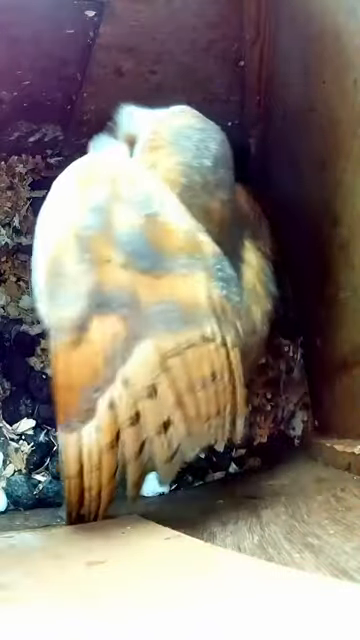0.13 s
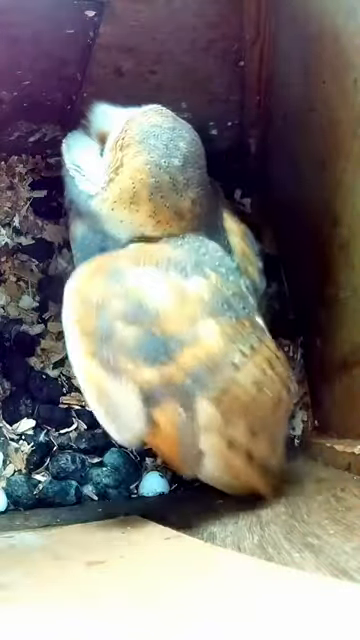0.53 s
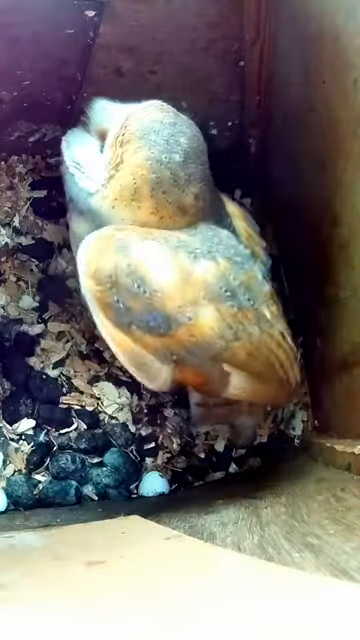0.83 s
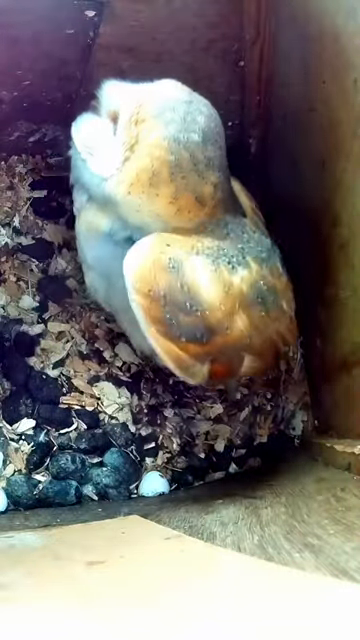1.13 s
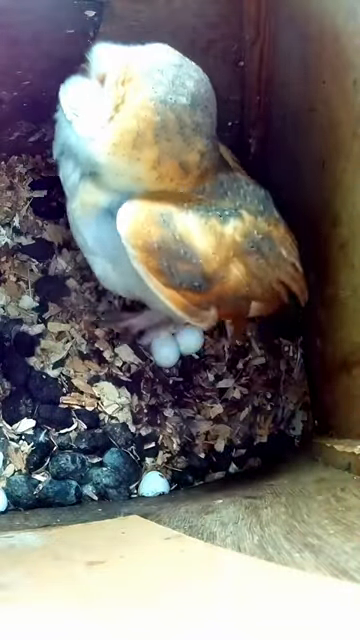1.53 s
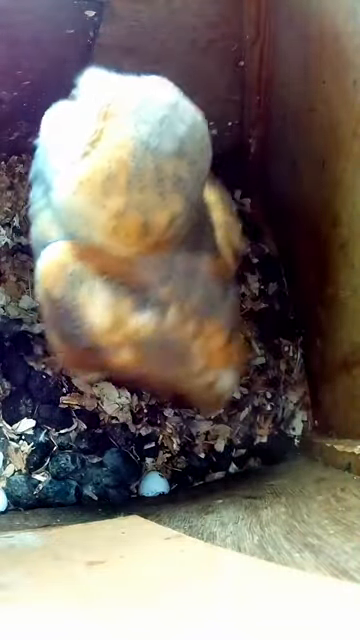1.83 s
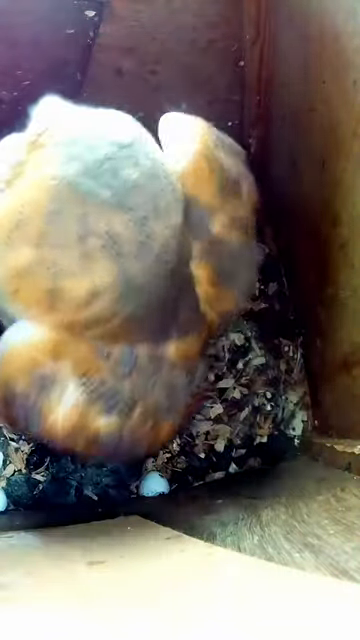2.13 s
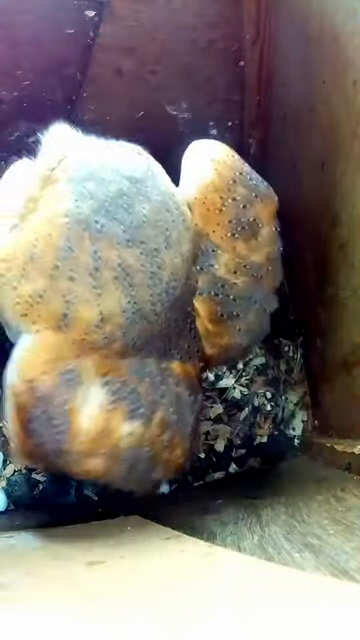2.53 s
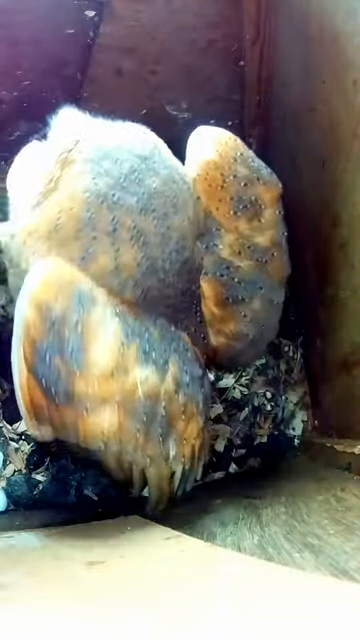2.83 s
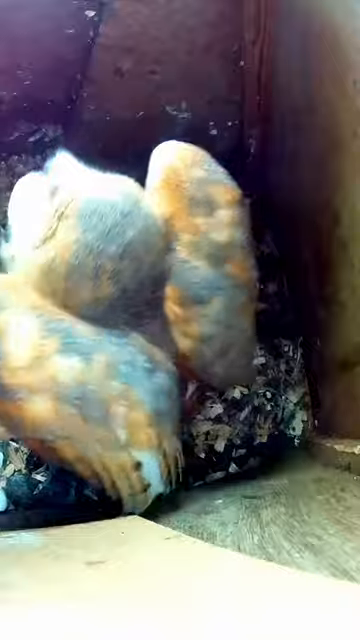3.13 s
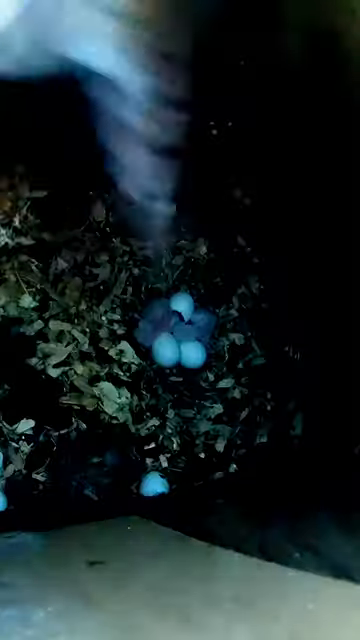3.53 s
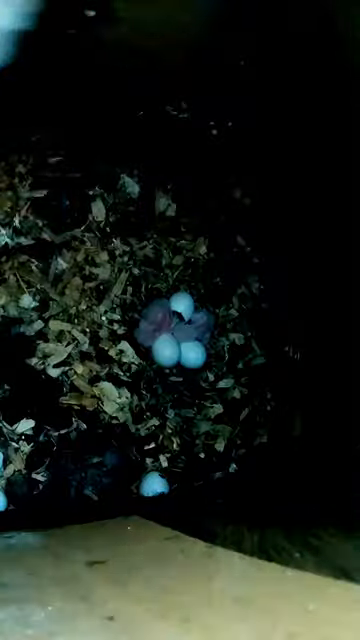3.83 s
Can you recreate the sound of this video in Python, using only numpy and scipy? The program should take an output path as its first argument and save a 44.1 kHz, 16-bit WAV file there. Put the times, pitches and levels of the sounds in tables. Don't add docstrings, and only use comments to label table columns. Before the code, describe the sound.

An owl moves in a wooden nest box, heard close up. Until 2.6 seconds there is quiet rumble, faint hiss, dry litter specks, tiny ticks, a distant songbird and a soft boom near 1.1. At 2.7 low thumps begin; from 2.8 to 3.0 come two short creaks, feather swish, sharp claw snaps and loud board knocks. Smaller knocks follow at 3.3, 3.45 and 3.8, with a faint scrape at 3.6 and tiny peeps at the end.

```python
import sys
import numpy as np
from scipy import signal
from scipy.fft import rfft, irfft
from scipy.io import wavfile
from scipy.ndimage import uniform_filter1d

SR = 44100
rng = np.random.default_rng(int(sys.argv[2]) if len(sys.argv) > 2 else 0)


def dump(signal):
    limited = np.clip(np.atleast_2d(signal).T, -1, 1)
    pcm = np.round(limited * 32767).astype(np.int16)
    wavfile.write(sys.argv[1], SR, pcm)


def convert_level_to_amplitude(level_db):
    exponent = np.asarray(level_db, float) / 20
    return 10 ** exponent


N = 176400

# time in seconds, level in dB.
STIR_LEVEL = [(2.551, -61), (2.7, -49), (2.85, -32.5), (3.0, -43.5), (3.2, -44.5), (3.25, -50.5),
              (3.32, -53), (3.44, -50), (3.5, -46.5), (3.66, -49.5), (3.79, -42.5), (3.88, -46.5),
              (4.0, -54)]
# frequency in Hz, density in dB per Hz.
STIR_SPECTRUM = [(60, 5), (130, -21), (200, -19), (285, -10), (520, -22), (1050, -27), (1600, -35),
                 (16000, -47.5)]
# start in seconds, length in seconds, level in dB, centre in Hz.
SWISHES = [(0.77, 0.067, -64.5, 8800), (1.077, 0.044, -62, 10900), (1.081, 0.1, -51.5, 160),
           (1.141, 0.021, -66.5, 4630), (1.432, 0.072, -69.5, 8000), (2.47, 0.062, -67.5, 9000),
           (2.637, 0.042, -58.5, 9600), (2.678, 0.0088, -51, 8900), (2.702, 0.072, -48, 5900),
           (2.643, 0.26, -42.5, 147), (2.783, 0.078, -39, 9650), (2.854, 0.16, -58, 3840),
           (2.889, 0.072, -31.5, 750), (2.989, 0.048, -52.5, 5700), (3.036, 0.067, -59, 5500),
           (3.09, 0.15, -48.5, 6000), (3.297, 0.086, -54, 670), (3.453, 0.025, -58, 7000),
           (3.478, 0.26, -54, 820), (3.696, 0.081, -49.5, 415), (3.488, 0.13, -68, 3800),
           (.69, 0.22, -59, 167), (1.483, 0.079, -60, 172), (3.64, 0.23, -67, 6000),
           (3.761, 0.092, -39, 234), (3.902, 0.11, -63.5, 6500)]
# time in seconds, peak in dB, centre in Hz, spread in octaves, snap in ms.
TICKS = [(.845, -46, 8000, 1.5, 1.34), (0.9093, -47, 11000, .8, 1.6), (1.081, -51, 9000, 1.2, 1.8),
         (1.109, -54, 4000, 1, 1.9), (2.6455, -47, 8000, 0.38, 0.9), (2.707, -46, 4000, 1.2, 1.5),
         (2.7216, -31, 1660, 0.45, 2.6), (2.7544, -28.5, 4500, 1.3, 0.65), (2.7605, -33, 4000, .9, 0.66),
         (2.8297, -24, 6500, 0.88, 0.77), (2.835, -24.5, 3750, 0.73, 4), (2.8954, -33, 4770, 0.57, 1.1),
         (2.908, -26, 4300, 0.42, 1), (2.91, -27.5, 5100, 0.88, 2.2), (2.917, -26, 4270, 0.34, 1.2),
         (2.9235, -25, 4530, 0.44, 1.4), (2.9274, -13, 6040, 0.58, 2.03), (2.9283, -16, 2150, 0.6, 2.47),
         (2.943, -29, 4240, 0.77, 1.1), (2.96, -30.5, 4200, 0.56, 2), (2.9691, -24, 4630, 0.65, 1.46),
         (3.0515, -38.5, 4000, 0.82, 1.8), (3.2832, -41.5, 5500, 0.99, 2.5),
         (3.2864, -37.5, 2400, 0.6, 3.2), (3.2993, -42, 3800, 0.37, 1.2), (3.315, -45.5, 3800, 0.88, 1.6),
         (3.387, -51.5, 3200, 0.97, 2.2), (3.448, -47, 4940, 0.77, 1.5), (3.458, -37, 5500, 1, 2.7),
         (3.4699, -34.5, 5460, 0.61, 2.3), (3.5363, -49, 2200, 0.81, 1.8), (3.571, -34.5, 4100, 0.59, 2.6),
         (3.572, -33, 1600, 0.36, 2), (3.5864, -36.5, 3500, 0.13, 2), (3.618, -33.5, 6130, 0.88, 2.5)]
# time in seconds, peak in dB, pitch factor, low-mode share in dB, ring factor.
KNOCKS = [(.067, -48, 0.57, 13, .9), (.325, -57.5, 0.97, -10, 0.6), (.695, -52.5, 0.88, -1.5, .9),
          (.775, -53.5, 0.82, -14, 0.64), (0.842, -50.5, 0.58, 7, .9), (1.083, -55, 0.96, -14, 0.49),
          (2.72, -32.5, 0.75, -7, .6), (2.8271, -15.5, .95, -14.5, 0.6), (2.834, -19, 1.395, -5.5, 0.34),
          (2.838, -22.5, 0.92, -7, 0.7), (2.929, -13, 0.978, -14, 0.54), (2.9712, -21.5, 1.01, -0.5, 0.55),
          (2.978, -17, .97, 8.5, 0.87), (3.015, -30.5, .95, 5, 0.56), (3.108, -36.5, 0.83, 14, 0.72),
          (3.2856, -19, 1.04, -5, 0.46), (3.3, -30.5, 0.81, 2, .6), (3.316, -28, 1.03, 0.5, 0.59),
          (3.388, -31, 0.98, 3, 0.61), (3.449, -35, 0.76, -18, 0.83), (3.4608, -19, 0.971, -11, 0.51),
          (3.503, -42, 1.1, 0, 0.44), (3.517, -36.5, 0.99, 3, 0.65), (3.572, -37, 0.96, -5, 0.88),
          (3.586, -39, 0.97, -18, 0.46), (3.703, -40, 0.83, 22, 1.2), (3.749, -36, 1.4, -14, 1.5),
          (3.754, -34, 0.97, -6.5, 1.2), (3.776, -29.5, 0.93, 13, 0.7), (3.912, -48, 1.03, 1, .9)]
# frequency in Hz, level in dB, T60 in seconds.
BOARD_LOW = [(274, -12, 0.1), (398, -10, 0.033), (499, 0, 0.051), (562.7, -1, 0.048), (670, -12.5, 0.059)]
# frequency in Hz, level in dB, T60 in seconds.
BOARD_HIGH = [(759, -20.5, .06), (887, -9, 0.038), (972, 0, 0.051), (1069.6, -3, 0.045), (1358, -19, 0.03),
              (1500, -12, 0.029), (1713, -24, 0.046), (1937, -23, 0.031)]
# start in seconds, length in seconds, level in dB, low edge, start top, end top in Hz.
SCRAPE = (3.592, .036, -43, 3150, 4000, 6600)
# start in seconds, length in seconds, level in dB, rate in slips per second.
CREAKS = [
    (2.804, 0.042, -25, 150),
    (2.85, 0.085, -23.5, 159),
]
# time in seconds, peak in dB, frequency in Hz.
THUMPS = [(0.401, -37.5, 54.6), (1.113, -18, 60.6), (1.165, -24, 61.8), (2.726, -17, 40),
          (2.753, -15.5, 66.6), (2.828, -18.5, 98), (2.847, -26, 36.3), (2.89, -27, 45), (2.951, -20, 40),
          (2.998, -28, 45), (3.291, -25.5, 45), (3.482, -42, 49.3), (3.69, -32, 45), (3.781, -21.5, 156),
          (3.802, -27.5, 59.6)]
# start in seconds, length in seconds, level in dB, start in Hz, end in Hz.
PEEPS = [
    (3.768, .022, -60, 6200, 7500),
    (3.79, .065, -62, 8500, 7900),
    (3.922, .022, -65, 5400, 6600),
    (3.946, .022, -63, 6400, 7300),
    (3.953, .028, -62, 5000, 5900),
    (3.85, .015, -62, 8000, 6300),
]
# start in seconds, length in seconds, level in dB, start in Hz, end in Hz.
SONG = [(.63, 0.091, -71.5, 2200, 2550), (.72, 0.079, -70.5, 2650, 2440), (.79, 0.059, -70, 2420, 2230),
        (.72, 0.19, -72, 1827, 1890), (.99, 0.13, -76, 2230, 2140), (1.328, 0.18, -73, 2300, 2130),
        (1.46, 0.16, -76, 2160, 2240), (1.62, .06, -75, 2180, 2100), (1.771, 0.065, -69, 1810, 1750),
        (1.834, 0.15, -78.5, 1750, 1750), (2.331, 0.12, -69.5, 2310, 2260), (2.415, 0.13, -67, 2256, 2280)]
# frequency in Hz, density in dB per Hz.
HISS_SPECTRUM = [(53, -20), (90, -6.5), (188, -17.5), (1270, -29), (2760, -35), (12300, -40),
                 (16000, -44.5)]
# frequency in Hz, width in Hz, level in dB.
BOX_AIR = [(273.3, 21, -76), (531.4, 40, -77.5), (1164, 790, -72.5)]
# frequency in Hz, width in Hz, level in dB.
RUMBLE = [(52.9, 25, -45), (40, 8.9, -55.5)]

KNOCK_RISE_S = 0.0038
FIZZ_S = 0.004


def evened(x):
    return x / np.sqrt(np.mean(x ** 2) + 1e-20)


def add(mix, start_s, sound):
    part = mix[round(start_s * SR):][:len(sound)]
    part += sound[:len(part)]


def coloured(x, points):
    point_hz, db = np.transpose(points)
    hz = np.fft.rfftfreq(len(x), 1 / SR)
    gain = convert_level_to_amplitude(np.interp(np.log(hz + 1), np.log(point_hz + 1), db, left=-90))
    return irfft(rfft(x) * gain, len(x))


def banded(x, centre_hz, octaves):
    hz = np.fft.rfftfreq(len(x), 1 / SR) + 1
    bell = np.exp(-0.5 * (np.log2(hz / centre_hz) / octaves) ** 2)
    return evened(irfft(rfft(x) * bell, len(x)))


def lumps(size):
    smooth = uniform_filter1d(rng.standard_normal(N), size)
    return evened(uniform_filter1d(smooth, size))


def arch(t, peak):
    u = t / t[-1]
    peak = np.clip(peak, 0.1, 0.9)
    return np.sin(np.pi / 2 * np.minimum(u / peak, (1 - u) / (1 - peak)))


def ring(modes, pitch, rise_s, ring_factor):
    t = np.arange(SR // 2) / SR
    sound = np.zeros(len(t))
    for hz, db, t60_s in modes:
        detune, level = rng.uniform(-1, 1, 2)
        decay = convert_level_to_amplitude(db + 2 * level - 60 * t / t60_s / ring_factor)
        sound += decay * np.sin(2 * np.pi * hz * pitch * (1 + detune / 50) * t)
    return sound * (1 - np.exp(-(t / rise_s) ** 2))


def stir():
    time_s, db = np.transpose(STIR_LEVEL)
    level = convert_level_to_amplitude(np.interp(np.arange(N) / SR, time_s, db, left=-100))
    sway = convert_level_to_amplitude(1.5 * lumps(size=700))
    body = convert_level_to_amplitude(1) * sway * evened(coloured(rng.standard_normal(N), STIR_SPECTRUM))
    box_body = (155, 9, 0.088)  # Hz, dB, T60 in s
    boards = ring([box_body] + BOARD_LOW + BOARD_HIGH, 0.99, KNOCK_RISE_S, 2.2)
    rattle = evened(signal.oaconvolve(rng.standard_normal(N), boards)[:N])
    body += convert_level_to_amplitude(-8) * sway ** 2 * rattle
    buffet = convert_level_to_amplitude(7.5) * banded(rng.standard_normal(N), centre_hz=45, octaves=0.43)
    return level * (body + buffet)


def swish(start_s, length_s, db, hz):
    t = np.arange(0, length_s, 1 / SR)
    noise = rng.standard_normal((2, SR // 2))[:, :len(t)]
    grain = convert_level_to_amplitude(2.5 * evened(uniform_filter1d(noise[1], size=90)))
    peak, octaves = (0.68, 1.35) if hz > 1500 else (0.2, 0.675)
    return start_s, convert_level_to_amplitude(db) * arch(t, peak) * grain * banded(noise[0], hz, octaves)


def tick(start_s, db, hz, octaves, snap_ms):
    t = np.arange(1500) / SR
    u = t * 1e3 / snap_ms
    shape = np.exp(-np.maximum(u - 1, 0) * 2) + convert_level_to_amplitude(-14) * np.exp(-t / FIZZ_S)
    noise = banded(rng.standard_normal(1500), hz, octaves)
    return start_s, convert_level_to_amplitude(db - 5.5) * np.minimum(u, 1) * shape * noise


def knock(start_s, db, pitch, low_db, ring_factor):
    boards = convert_level_to_amplitude(low_db) * ring(BOARD_LOW, pitch, KNOCK_RISE_S, ring_factor)
    boards += ring(BOARD_HIGH, pitch, KNOCK_RISE_S, ring_factor)
    u = np.arange(SR // 2) / SR / 0.003
    scuff_hz = 950 * pitch * convert_level_to_amplitude(-max(low_db, 0) / 2)
    scuff = banded(rng.standard_normal(SR // 2), scuff_hz, 0.65) * u * np.exp(1 - u)
    return start_s - KNOCK_RISE_S / 4, convert_level_to_amplitude(db) * (boards / abs(boards).max() + convert_level_to_amplitude(-17) * scuff)


def scrape(start_s, length_s, db, low_hz, start_hz, end_hz):
    t = np.arange(0, length_s, 1 / SR)
    hz, at_s, z = signal.stft(rng.standard_normal(4000), SR, nperseg=128)
    hz = hz[:, None]
    top_hz = start_hz + (end_hz - start_hz) * (at_s / length_s)
    z = z * (hz > low_hz) / (1 + (hz / top_hz) ** 8)
    squeak = np.exp(-((hz - 3700) / 350) ** 2) + np.exp(-((hz - top_hz) / 600) ** 2)
    z = z * (1 + convert_level_to_amplitude(7) * squeak)
    noise = signal.istft(z, SR, nperseg=128)[1][:len(t)]
    return start_s, convert_level_to_amplitude(db) * arch(t, 0.64) * evened(noise)


def creak(start_s, length_s, db, slips_per_s):
    t = np.arange(0, length_s, 1 / SR)
    wobble = evened(uniform_filter1d(rng.standard_normal(SR // 5), size=250))[:len(t)]
    turns = np.cumsum(slips_per_s * (1 + 0.07 * wobble)) / SR
    slips = np.zeros(len(t))
    for k in range(1, 6):
        harmonic_db = -12 * np.log2(k) + 10 * (k == 2)
        slips += convert_level_to_amplitude(harmonic_db) * np.cos(2 * np.pi * k * turns - k)
    return start_s, -convert_level_to_amplitude(db) * arch(t, 0.7) * evened(slips)


def thump(start_s, db, hz):
    t = np.arange(SR // 2) / SR
    decay = convert_level_to_amplitude(db - 60 * t * hz / 12.3)
    rise = 1 - np.exp(-t / 0.004)
    return start_s, decay * rise * np.sin(2 * np.pi * hz * t)


def box(x):
    t = np.arange(SR // 5) / SR
    signs = rng.choice([-1., 1.], len(t)) * (rng.random(len(t)) < 0.06)
    taps = signs * convert_level_to_amplitude(-60 * t / 0.06) * (t > 0.002)
    return signal.fftconvolve(x, taps / np.linalg.norm(taps))[:N]


def whistle(start_s, length_s, db, start_hz, end_hz, smear):
    t = np.arange(0, length_s, 1 / SR)
    flutter, drift = uniform_filter1d(rng.standard_normal((2, SR // 4)), size=200)[:, :len(t)]
    glide = np.sin(np.pi / 2 * t / length_s) ** 2
    hz = (start_hz + (end_hz - start_hz) * glide) * (1 + smear * evened(drift))
    level = convert_level_to_amplitude(db + 2 * evened(flutter)) * np.sqrt(arch(t, 0.52))
    return start_s, level * np.sin(2 * np.pi * np.cumsum(hz) / SR)


def crackle():
    sizes = convert_level_to_amplitude(5.0 * np.minimum(rng.exponential(1, N), 3))
    specks = (rng.random(N) < 40 / SR) * sizes
    shape = signal.oaconvolve(specks, np.exp(-np.arange(600) / SR / FIZZ_S))[:N]
    return convert_level_to_amplitude(-79) * shape * banded(rng.standard_normal(N), centre_hz=11500, octaves=0.8)


def hum(hz, width_hz, db):
    r = np.exp(-np.pi * width_hz / SR)
    pole = [1, -2 * r * np.cos(2 * np.pi * hz / SR), r * r]
    x = signal.lfilter([1], pole, rng.standard_normal(N + SR))
    x = signal.lfilter([1, -1], pole, x)
    return convert_level_to_amplitude(db) * evened(x[SR:])


def background():
    hiss = evened(coloured(rng.standard_normal(N), HISS_SPECTRUM))
    hiss = convert_level_to_amplitude(-64 + lumps(size=900) / 2) * hiss
    return hiss + sum(hum(*row) for row in BOX_AIR + RUMBLE)


def scene():
    near, far = np.zeros(N), np.zeros(N)
    for source, rows in [(swish, SWISHES), (tick, TICKS), (knock, KNOCKS), (scrape, [SCRAPE]), (creak, CREAKS)]:
        for row in rows:
            add(near, *source(*row))
    for row in THUMPS:
        add(far, *thump(*row))
    for rows, smear in [(PEEPS, 0.015), (SONG, 0.005)]:
        for row in rows:
            add(far, *whistle(*row, smear))
    return (stir() + near + convert_level_to_amplitude(-12) * box(near) + far + crackle() + background())[None]


def roll_off(x):
    return signal.sosfilt(signal.butter(12, 16480, fs=SR, output="sos"), x)


def record(dry):
    edge = signal.firwin(511, 16100, window=("kaiser", 9), fs=SR)
    mix = signal.oaconvolve(dry, edge[None], "same")
    return roll_off(mix)


dry = scene()
out = record(dry)
dump(out)
```